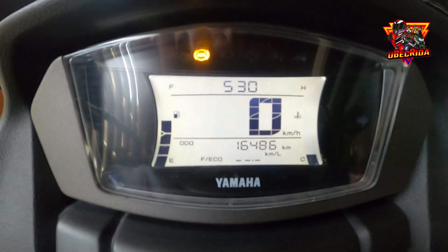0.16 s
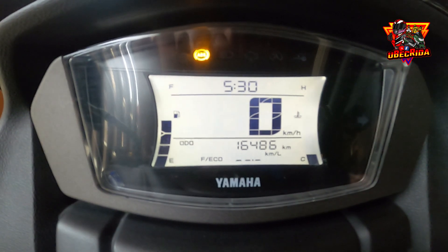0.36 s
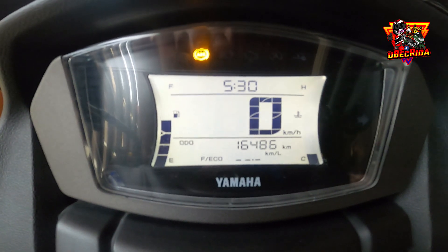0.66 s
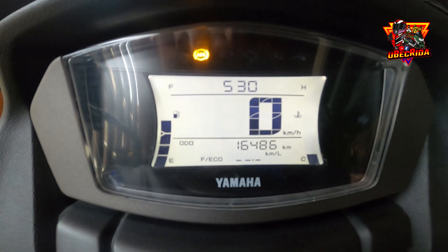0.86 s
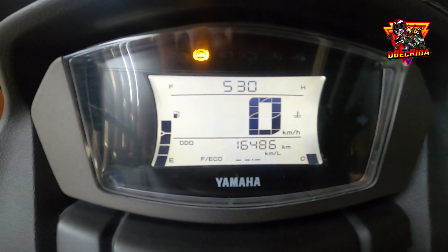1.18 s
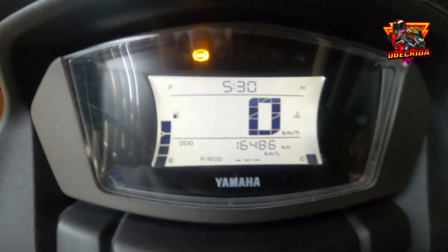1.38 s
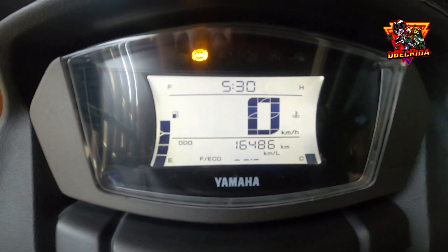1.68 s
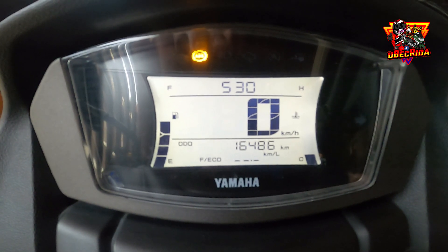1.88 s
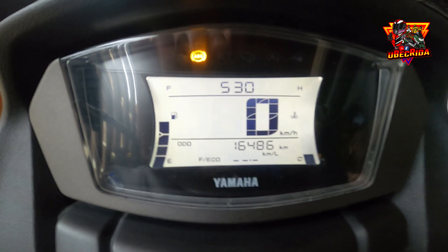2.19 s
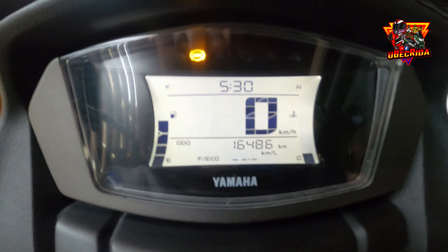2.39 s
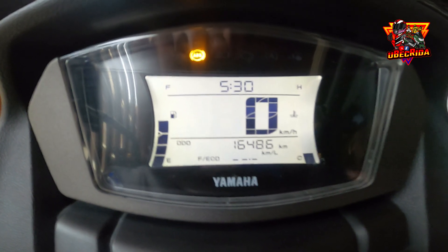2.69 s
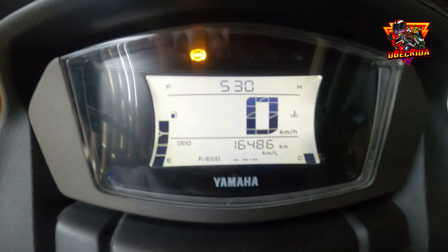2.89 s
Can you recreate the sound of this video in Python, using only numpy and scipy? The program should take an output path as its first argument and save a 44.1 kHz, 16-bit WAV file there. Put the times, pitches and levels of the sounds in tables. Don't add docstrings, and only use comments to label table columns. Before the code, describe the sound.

Scooter engine idling at a standstill, even low putter over ticking valves and soft fan hiss.

```python
import sys
import numpy as np
from scipy import signal
from scipy.fft import rfft, irfft, next_fast_len
from scipy.io import wavfile
from scipy.ndimage import uniform_filter1d, minimum_filter1d, map_coordinates

SR = 44100
rng = np.random.default_rng(int(sys.argv[2]) if len(sys.argv) > 2 else 0)


def bounce(signal):
    frames = np.transpose(np.atleast_2d(signal))
    limited = np.clip(frames, -1, 1)
    pcm = np.round(limited * 32767).astype(np.int16)
    wavfile.write(sys.argv[1], SR, pcm)


def volts_from_db(level):
    exponent = np.asarray(level, float) / 20
    return 10 ** exponent


N = 134505
PRE = SR // 2
M = N + PRE


def unit(x):
    return x / np.sqrt(np.mean(x ** 2) + 1e-20)


def along(points, hz):
    f, v = np.transpose(points)
    return np.interp(np.log(hz + 1), np.log(f + 1), v)


def shaped(spectrum):
    return lambda hz: volts_from_db(along(spectrum, hz))


def filtered(x, response):
    m = next_fast_len(M + SR // 2)
    hz = np.fft.rfftfreq(m, 1 / SR)
    return irfft(rfft(x, m) * response(hz), m)[..., :x.shape[-1]]


def resonant(modes):
    def response(f):
        total = 0
        for k, (center, width, db) in enumerate(modes):
            damping = 1j * f * width
            total = total + (-1) ** k * volts_from_db(db) * damping / (center * center - f * f + damping)
        return total
    return response


def pulses(times, sizes):
    at = np.round(times * SR).astype(int) + PRE
    ok = (at >= 0) & (at < M)
    return np.bincount(at[ok], (sizes + 0 * times)[ok], M)


def wobble(rate):
    knots = rng.standard_normal(int(M * rate / SR) + 4)
    return map_coordinates(knots, [np.arange(M) * rate / SR])


def spread(response):
    # frequency in Hz, likeness of the two sides (1 = identical).
    alike = [(60, 1), (300, .98), (640, .93), (1400, .8), (3100, .5), (6800, .3), (15000, .1)]

    def mid_side(hz):
        turn = np.arccos(np.clip(along(alike, hz), -1, 1)) / 2
        return response(hz) * [np.cos(turn), np.sin(turn)]

    mid, side = filtered(rng.standard_normal((2, M)), mid_side)
    return unit(np.array([mid + side, mid - side]))


def cycles(t):
    # time in seconds, firings per second.
    speed = [(0.0, 15.588), (0.179, 15.307), (0.359, 15.075), (0.538, 14.405), (0.718, 14.478),
             (0.897, 14.671), (1.076, 14.602), (1.256, 14.863), (1.435, 14.318), (1.615, 15.016),
             (1.794, 14.788), (1.974, 14.382), (2.153, 14.253), (2.332, 14.107), (2.512, 14.129),
             (2.691, 13.941), (2.871, 14.032), (3.05, 14.446)]
    turns = np.cumsum(np.interp(t, *np.transpose(speed))) / SR
    return turns - turns[PRE] - 0.487


def crank(share):
    exhaust_lead_s = 0.0163
    t = (np.arange(M + SR) - PRE) / SR
    return np.interp(np.arange(-8, 48) + share, cycles(t), t) - exhaust_lead_s


def air():
    # frequency in Hz, level in dB.
    fan_hiss = [(760, -28), (1300, -18), (1530, -7.5), (2090, -6.5), (2580, -5.5), (5270, -12.5),
                (6100, -16.5), (12200, -35.5), (15500, -51)]
    low_rumble = [(100, -60.5), (150, 1.5), (240, 3.5), (265, -11), (310, 5), (350, -25), (600, -22.5),
                  (1500, -93)]
    # frequency in Hz, width in Hz, level in dB.
    whines = [(1891, 25, 1.5), (2371, 25, -1.5), (2620, 41, -4), (3076, 54, -2), (3403, 21, 0),
              (4060, 170, -6.5), (5250, 140, -7), (7700, 560, -17.5)]
    fan_db = -41.5 + 0.2 * wobble(2.4) + 0.77 * wobble(25.41)
    fan = volts_from_db(fan_db) * spread(shaped(fan_hiss))
    rumble = volts_from_db(-37.5 + 0.97 * wobble(21)) * spread(shaped(low_rumble))
    whine_body = lambda f: resonant(whines)(f) / (1 + (f / 9000) ** 6)
    whine = volts_from_db(-47 + 0.83 * wobble(6.7)) * spread(whine_body)
    return fan + rumble + whine


def clicks():
    # time in seconds, peak level in dB.
    snaps = [
        (0.6294, -45.5),
        (2.127, -40.5),
        (2.475, -45),
        (2.6958, -33),
    ]
    s, db = np.transpose(snaps)
    return filtered(pulses(s, volts_from_db(db + 12.5)), resonant([(11000, 6000, 0)]))


def alternator():
    # order per engine cycle, level in dB.
    orders = [(36, -31.5), (72, -35.5), (108, -51), (180, -58), (216, -57), (360, -64)]
    # frequency in Hz, gain in dB.
    fairing = [(460, 11.5), (505, 0), (560, -5.5), (900, -6), (1040, 0), (1150, -1), (1500, 1)]
    surge, surge_at = 0.041, 0.8
    slip, flutter_db = 0.0024, 3
    pulse_db = 2.5
    turns = cycles((np.arange(M) - PRE) / SR)
    u = 2 * np.pi * (turns - surge_at)
    swing = surge * (np.cos(u) + np.cos(2 * u) / 4) / (2 * np.pi)
    angle = turns - swing + slip * wobble(45)
    swell_db = pulse_db * np.cos(2 * u - 0.4)
    hum = 0
    for order, db in orders:
        level = volts_from_db(db + flutter_db * wobble(45) + swell_db)
        hum = hum + level * np.sin(2 * np.pi * np.round(order) * angle)
    return filtered(hum, shaped(fairing))


def rattle():
    # frequency in Hz, width in Hz, level in dB.
    casing = [(389, 81, -8.5), (505.5, 61, -2.5), (686.4, 99, -13), (1005.5, 95.4, -8.5),
              (1687, 345, -21.5)]
    # share of the cycle after the exhaust opens, level in dB.
    contacts = [
        (0.032, 5),
        (0.302, -15),
        (.5, -1),
        (0.682, -0.5),
    ]
    tick_db, tick_scatter_db, tick_jitter_s = 8.5, 2.5, 0.0012
    rattle_db, puff_db, puff_t60_s = -29, 0.5, 0.074
    ticks = 0
    for share, db in contacts:
        at = crank(share)
        luck = rng.standard_normal((len(at), 2))
        sizes = volts_from_db(db + tick_scatter_db * luck[:, 1])
        ticks = ticks + pulses(at + tick_jitter_s * luck[:, 0], sizes)
    decay_s = puff_t60_s / np.log(1000)
    gate = filtered(ticks, lambda f: 1 / (1 + 2j * np.pi * f * decay_s) ** 2)
    puffs = 1 + volts_from_db(puff_db - 2) * gate / gate.mean()
    panels = lambda f: resonant(casing)(f) / (1 + (f / 5000) ** 4)
    belt = spread(panels) * puffs * volts_from_db(0.69 * wobble(3.9))
    return volts_from_db(tick_db) * filtered(ticks, resonant(casing)) + volts_from_db(rattle_db) * unit(belt)


def breathing():
    # frequency in Hz, width in Hz, level in dB.
    muffler = [(61.7, 17.6, 14.5), (106.64, 16.95, 24.5), (126.86, 10.1, 25), (134.9, 2.8, 13.5),
               (175, 18, -9.5), (221.3, 18.4, 8)]
    air_box = [(45.3, 14, 18.5), (61.8, 33.6, 19.06), (119.6, 14, 23.8), (192.4, 58, 2.7)]
    frame = [(157, 36, -2), (192, 30, 0.5), (240.7, 8.7, 2), (293, 12.4, 3.5), (318.1, 10.4, 3.5)]
    # time in seconds, load in dB.
    load = [(0, -0.9), (.4, 0.2), (.7, 0), (1.3, -1.5), (2, -1), (2.3, -0.35), (3.05, -1.8)]
    thump_db, scatter_db, jitter_s = 31.5, 0.46, 0.000053
    blows = [(0, muffler, 212), (0.02918, air_box, 125), (0.00753, frame, 513)]
    opens = crank(0)
    luck = rng.standard_normal((len(opens), 6))
    load_db = thump_db + np.interp(opens, *np.transpose(load))
    out = 0
    for k, (lag_s, body, soft_hz) in enumerate(blows):
        sizes = volts_from_db(load_db + scatter_db * luck[:, 3 + k])
        train = pulses(opens + lag_s + jitter_s * luck[:, k], sizes)
        out = out + filtered(train, lambda f: resonant(body)(f) / (1 + 1j * f / soft_hz) ** 2)
    return out


def scene():
    # frequency in Hz, left minus right in dB.
    left = [(60, -3.0), (150, -3.0), (380, -3.5), (950, -1.5), (2380, 2), (5980, -3), (15000, -0.5)]
    # frequency in Hz, lead of the left in radians.
    leads = [(60, 0), (400, 0), (860, .3), (1810, -1.2), (2840, -.6), (3400, -1.2), (5200, -.3), (7800, -2)]
    mix = air() + clicks() + alternator() + rattle() + breathing()

    def sides(hz):
        half = volts_from_db(along(left, hz) / 2) * np.exp(0.5j * along(leads, hz))
        return np.array([half, 1 / half])

    return filtered(mix, sides)[:, PRE:]


def roll_off(x):
    return signal.sosfilt(signal.butter(12, 20000, fs=SR, output="sos"), x)


def record(dry):
    ceiling, hold_s = 1.2, 0.036
    x = filtered(dry, lambda hz: hz < 15600)
    span = int(hold_s * SR)
    need = np.minimum(1, ceiling / (np.abs(x).max(0) + 1e-9))
    x = x * uniform_filter1d(minimum_filter1d(need, span), span)
    return roll_off(np.clip(x, -1, 1))


dry = scene()
out = record(dry)
bounce(out)
```